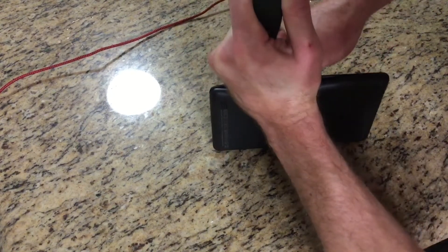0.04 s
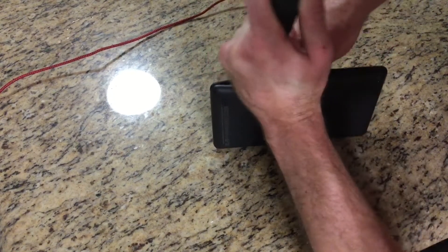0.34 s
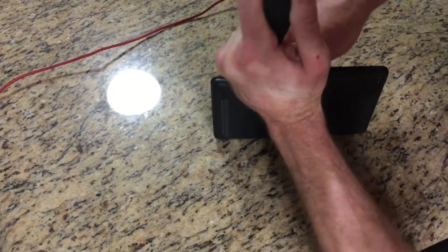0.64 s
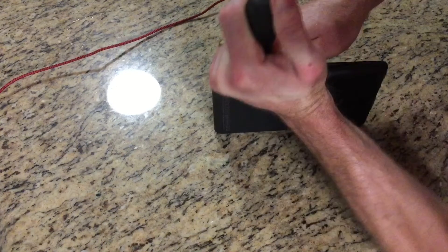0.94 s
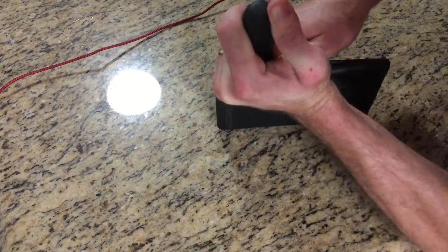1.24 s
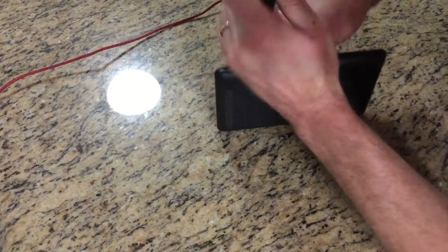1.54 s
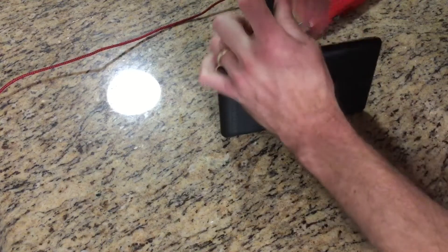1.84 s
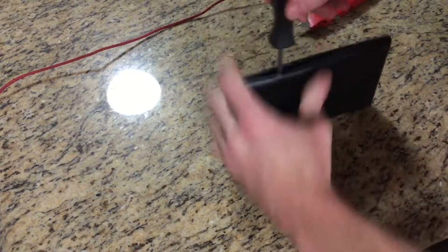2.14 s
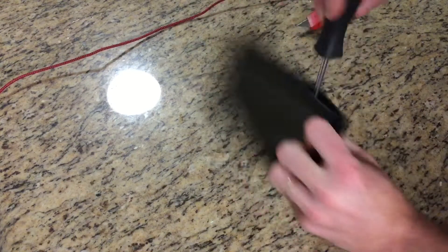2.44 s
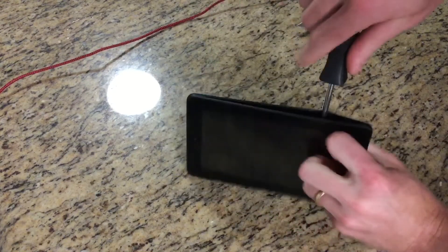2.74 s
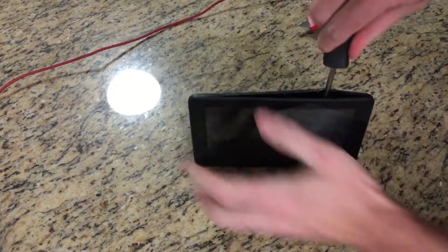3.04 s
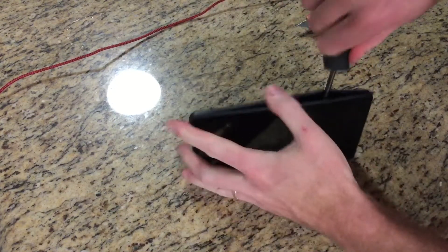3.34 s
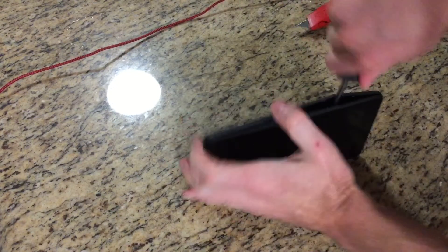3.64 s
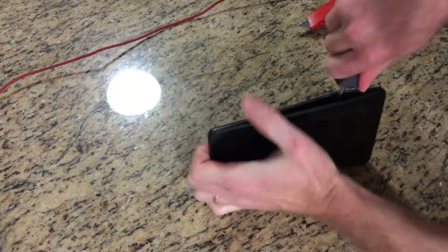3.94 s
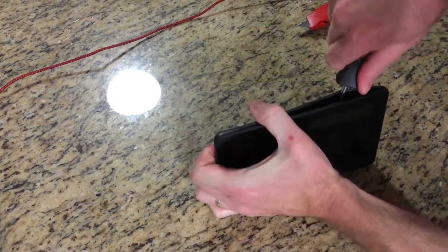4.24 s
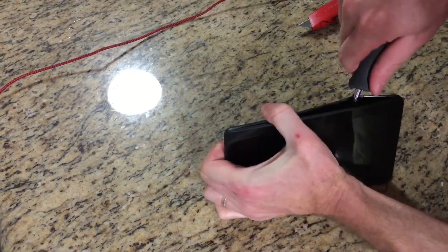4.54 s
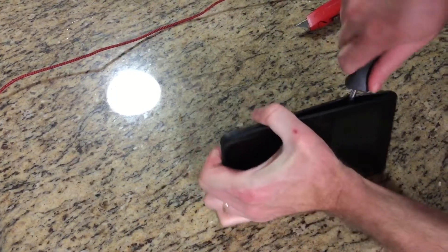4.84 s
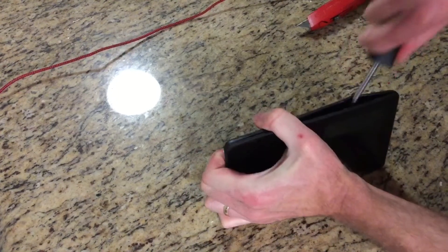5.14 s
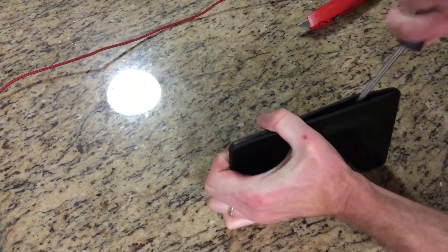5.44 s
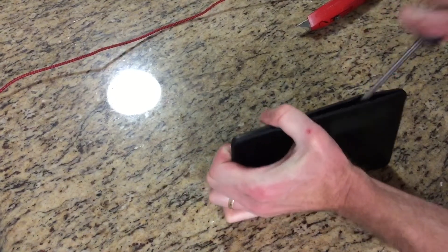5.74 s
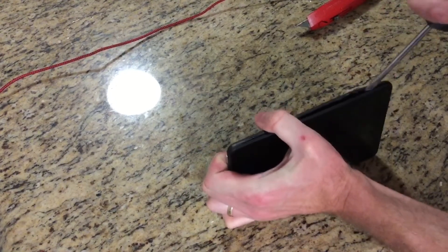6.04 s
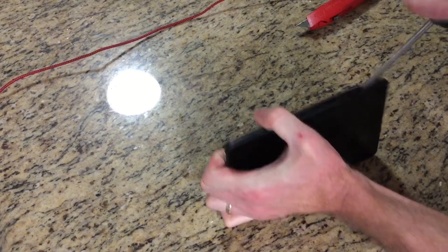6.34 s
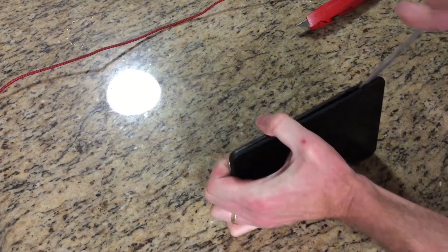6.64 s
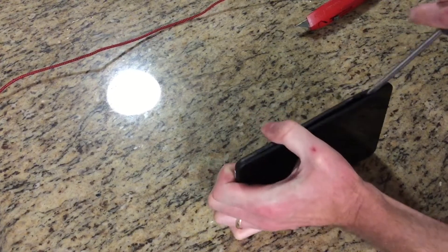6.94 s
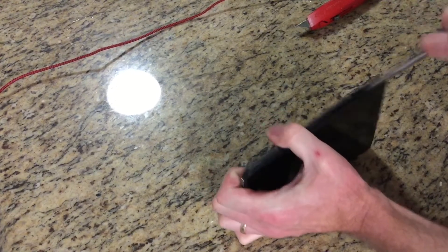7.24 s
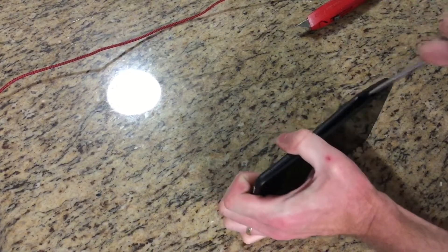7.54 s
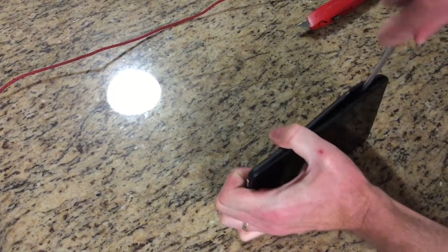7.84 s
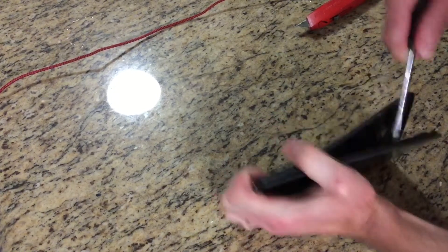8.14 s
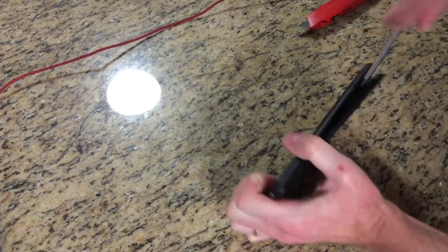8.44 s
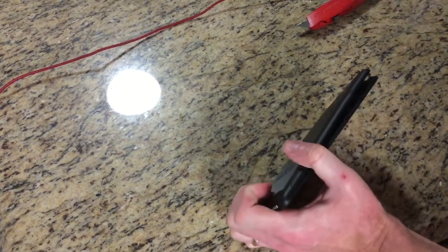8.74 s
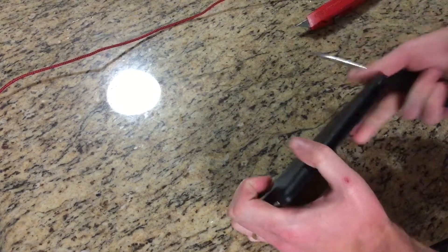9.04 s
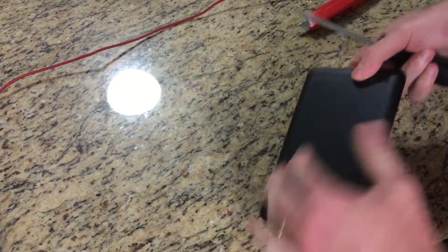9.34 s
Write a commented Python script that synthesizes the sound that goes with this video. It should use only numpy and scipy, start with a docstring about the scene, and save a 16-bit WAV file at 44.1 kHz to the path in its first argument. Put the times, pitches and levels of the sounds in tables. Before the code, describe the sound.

Plastic ticks and snaps irregularly as a tablet case is pried open indoors, with a short metal skid and a loud crack late on.

```python
"""On a stone counter in a hard-walled room, a screwdriver pries open a tablet's plastic case, close-miked.
The strained seam ticks, and catches let go in short snaps that ring the shell. Hands and case rub,
the case judders and bumps on the stone, and the steel blade squeaks and skids. One big crack
overloads the microphone. The walls answer the handling, over a bed of low noise and appliance hum."""
import sys
import numpy as np
from scipy import signal
from scipy.fft import rfft, irfft, next_fast_len
from scipy.io import wavfile

SR = 44100
rng = np.random.default_rng(int(sys.argv[2]) if len(sys.argv) > 2 else 0)


def master(y):
    """Save y as 16-bit WAV."""
    cut = np.clip(np.atleast_2d(y).T, -1, 1)
    pcm = np.round(cut * 32767)  # scale
    wavfile.write(sys.argv[1], SR, pcm.astype(np.int16))


N = 414533
BINS_HZ = np.arange(2049) * SR / 4096
# spectrum of a fresh fracture: f/Hz, level/dB
FRACTURE = [(500, -39.5), (2000, -6), (4000, 0.5), (6000, -1.5), (8500, -1.5), (11000, 0.5), (16000, -3.5)]


def undb(db):
    """Decibels to gain."""
    return 10 ** (np.asarray(db) / 20)


def unit(x):
    """Scale to rms 1."""
    return x / np.sqrt(np.mean(x ** 2) + 1e-30)


def clock(length):
    """Sample times for that many seconds."""
    return np.arange(int(length * SR)) / SR


def add(out, s, x):
    """Mix x in at time s."""
    i = max(int(s * SR), 0)
    out[i:i + len(x)] += x[:len(out) - i]


def along(points, hz):
    """Read (f/Hz, value) points on a log-frequency axis."""
    f, v = np.transpose(points)
    return np.interp(np.log(hz + 0.0012), np.log(f), v)


def colour(x, points, tilt_db=0):
    """EQ x with a curve, tilted per octave about the middle treble."""
    size = next_fast_len(len(x) + 512)
    hz = np.arange(size // 2 + 1) * SR / size
    gain = undb(along(points, hz) + tilt_db * np.log2((hz + 100) / 3000))
    return irfft(rfft(x, size) * gain, size)[:len(x)]


def band(x, hz, kind, order=2):
    """Butterworth filter."""
    return signal.sosfilt(signal.butter(order, hz, kind, fs=SR, output="sos"), x)


def wander(rate, size, count=1024):
    """Random drift of spread near 1, with that many turning points a second."""
    return 1.2 * np.interp(np.arange(size) * rate / SR, np.arange(count), rng.standard_normal(count))


def ring(modes, t):
    """Decaying modes in random phase."""
    hz, db, t60 = np.transpose(modes)[:, :, None]
    cycles = hz * t + rng.random((len(modes), 1))
    return np.sum(undb(db) * 0.00066 ** (t / t60) * np.sin(2 * np.pi * cycles), axis=0)


def blow(x, db):
    """Scale a hit so that its energy, packed into 4 ms, has this level."""
    return x * undb(db) * np.sqrt(.004 * SR / (np.sum(x ** 2) + 1e-30))


def resonance(hz, q):
    """Gain of a damped resonance, 1 at its centre."""
    ratio = (BINS_HZ + 1) / hz
    return 1 / (1 + (q * (ratio - 1 / ratio)) ** 2)


def shell_gain(floor_db=-13):
    """The shell's tone: broad, well-damped resonances over a bed of weaker ones."""
    # resonances of the plastic: f/Hz, width/Hz, level/dB
    resonances = [(364, 20, -2.5), (568, 60, 3.5), (780, 200, 2), (1000, 60, 1), (1156, 83, 4),
                  (1320, 180, 3), (1647, 460, 6), (2280, 600, 3), (2762, 240, -1), (3330, 520, 0),
                  (4200, 400, -7.5), (4850, 380, -4), (5550, 450, -8.5), (6300, 482, -3), (7100, 730, -6.5),
                  (8680, 2000, -2.5), (11100, 5100, -8), (13400, 3300, -4.5)]
    hz, width, db = np.transpose(resonances)[:, :, None]
    peaks = undb(db) ** 2 / (1 + (2 * (BINS_HZ - hz) / width) ** 2)
    return np.sqrt(peaks.sum(axis=0) + undb(floor_db) ** 2)


def spot_gain(depth_db, spacing_hz):
    """Each spot on the shell favours some of its many close modes over others."""
    ripple = np.clip(rng.standard_normal(512), -2, 2)
    return undb(depth_db * np.interp(BINS_HZ / spacing_hz, np.arange(512), ripple))


def strike(gain, tear_s=0):
    """Impulse response with this spectrum; its parts arrive scattered over the tearing time."""
    cepstrum = irfft(np.log(gain + 1e-9))
    size = len(cepstrum)
    # minimum phase puts the energy up front
    cepstrum[1:size // 2] *= 2
    cepstrum[size // 2 + 1:] = 0
    delay = tear_s * (.5 + .5 * np.tanh(wander(900, len(gain))))
    return irfft(np.exp(rfft(cepstrum) - 2j * np.pi * np.cumsum(delay) * BINS_HZ[1]))[:size // 2]


def room_tone(air_db=-51.5, sway_db=2.0, drift_hz=2.577):
    """A bed of low room noise and the wavering hum of an appliance."""
    # spectrum of the room noise: f/Hz, level/dB
    air = [(15, -53.5), (25, -39), (48, -16), (86, -12.5), (113, -1), (169, -12.5), (209, -6), (322, -13.5),
           (359, -10.5), (552, -23), (631, -18.5), (804, -25.5), (1270, -28.5), (1750, -36), (4500, -48),
           (15500, -58)]
    # tones of the hum: f/Hz, level/dB
    hum = [(119.5, -53), (210, -55), (637, -68.5)]
    out = undb(air_db) * unit(colour(rng.standard_normal(N), air))
    for hz, db in hum:
        cycles = np.cumsum(hz + drift_hz * wander(23, N)) / SR
        out += undb(db + sway_db * wander(26, N)) * np.sin(2 * np.pi * cycles)
    return out


def ticks(per_s=2.3, count=8, db=-77, panel_hz=2520, crack_db=-14, knock_hz=1000, knock_db=-24):
    """Strained plastic ticks faintly at random moments; returns rows for snaps()."""
    # the blade works into the seam: start/s, end/s
    prying = [(0.098, 1.4), (3.3, 4.6), (6.0, 7.0)]
    rows = []
    for start, end in prying:
        times = start + (np.arange(count) + rng.random(count)) / per_s
        for s, (level, pitch, crack) in zip(times, rng.standard_normal((count, 3))):
            if s < end:
                hz = panel_hz * 2 ** (0.35 * pitch)
                rows.append((s, db + 4 * level, hz, crack_db + 5 * crack, knock_hz, knock_db))
    return rows


def snaps(tick_rows, panel_db=-9.5, tear_s=.002, flex_s=.0006, splinter_db=-10, splinter_s=0.012):
    """A catch tears free, or the case takes a dull tap: crack, panel ring, hollow knock. Returns direct sound
    and room send."""
    # catches letting go, and dull taps with hardly any crack: t/s, level/dB, panel f/Hz, relative crack/dB,
    # knock f/Hz, relative knock/dB
    events = [(0.194, -46.5, 1075, -41.5, 890, -11), (0.53, -36.5, 970, -50, 870, -5),
              (0.778, -51.5, 2500, -21, 1000, -14), (0.865, -29.5, 2560, -1.5, 870, -8),
              (0.989, -59, 3000, 2, 900, -25), (1.08, -47.5, 2540, -20, 1000, -10),
              (1.19, -49, 2520, -20, 990, -10), (1.375, -46.5, 2600, -16, 1050, -8.5),
              (1.42, -44.5, 2880, -7.5, 1000, -6), (1.578, -19.5, 2020, -19.5, 540, -11),
              (1.619, -32, 1220, -11, 550, -24), (2.261, -53.5, 2200, 1.5, 910, -5),
              (2.352, -51, 3300, -3, 926, -12), (2.508, -39.5, 880, -46, 700, -9),
              (2.622, -16.5, 1694, -10, 830, -9.5), (2.915, -35.5, 2900, -4.5, 1500, -29),
              (3.421, -54.5, 3000, -8.5, 1250, -7), (3.806, -46.5, 3450, -24, 1300, -14),
              (4.451, -42.5, 2100, -11.5, 895, -22), (4.783, -39.5, 1890, -34, 920, -17),
              (4.807, -17, 1780, -46, 450, -14), (4.878, -20.5, 2070, -19.5, 445, -15),
              (5.405, -41.5, 2100, -12, 900, -34), (5.754, -25.5, 2300, -9.5, 1500, -21),
              (5.778, -19.5, 1750, -12.5, 520, -8), (5.781, -10.5, 2830, -10.5, 1137, -13),
              (5.806, -15.5, 2000, -8.5, 1081, -10.5), (6.222, -69.5, 3500, 8.5, 1010, -22),
              (6.3, -43, 1810, -26, 894, -4.5), (7.139, -25.5, 2280, -13, 890, -12.5),
              (7.78, -56.5, 3470, -4, 1418, -16.5), (7.891, -40.5, 1580, -31.5, 800, -8.5),
              (8.029, -1.5, 1960, -4, 737, -10), (8.288, -16.5, 3220, -6, 1830, -13.5),
              (8.464, -39.5, 1187, -33, 800, -6), (8.59, -39.5, 2056, -18, 825, -2.5),
              (8.931, -51.5, 1474, 5, 865, 1)]
    out, shell, hz, t = np.zeros((2, N)), shell_gain(), BINS_HZ + 1, clock(.02)
    top_octaves = np.log2(np.maximum(hz / 5000, 1))
    for s, db, panel_hz, crack_db, knock_hz, knock_db in events + tick_rows:
        # a weak crack is also a blunt one: it loses its top first
        crack = undb(along(FRACTURE, hz) + 0.8 * min(crack_db, 0) * top_octaves)
        panel, knock = resonance(panel_hz, q=1.2), resonance(knock_hz, q=1.0)
        layers = (panel, panel_db), (knock, knock_db), (crack, crack_db - 1)
        power = sum((unit(shape * shell) * undb(layer_db)) ** 2 for shape, layer_db in layers)
        # tiny splinters give way just after the main break
        force = rng.standard_normal(len(t)) ** 3 * np.exp(-t / splinter_s)
        force *= undb(splinter_db) / np.sqrt(np.sum(force ** 2))
        force[0] += 1
        # the microphone hears some modes more than others; the walls get them more evenly
        spot = spot_gain(depth_db=4.5, spacing_hz=240)
        for path, reach in zip(out, (spot, np.sqrt(spot))):
            snap = signal.fftconvolve(force, strike(np.sqrt(power) * reach, tear_s))
            add(path, s + flex_s, blow(snap, db + 10 * np.log10(power.mean())))
    return out


def rubs(grain_db=2.5, snags_per_s=90, snag_db=-6, attack_s=0.05, release_s=0.065):
    """Hands, case and blade slide: fine grain and harder snags, heard through seam and shell."""
    # strokes: t/s, length/s, level/dB, tilt/(dB per octave), rubbed part's f/Hz, its ring/dB
    strokes = [(0.223, 0.24, -73.5, 0, 1090, 1), (0.408, 0.29, -70, -1, 1090, 15),
               (1.66, 0.69, -77, 6.5, 10300, 4), (2.216, 0.16, -59, -2.5, 6450, 7.5),
               (2.321, 0.075, -54.5, 9.5, 7000, -1), (2.75, 0.11, -61, 3.5, 5070, -8),
               (3.548, 0.14, -54.5, -2, 600, -3), (3.77, 0.2, -72.5, -0.5, 1500, -8),
               (4.332, 0.2, -59.5, -3, 4200, -8), (4.982, 0.29, -58.5, 1.5, 3400, -2),
               (5.041, 0.27, -66, -13.5, 219, 2), (5.377, 0.12, -59, 0, 2020, -0.5),
               (5.462, 0.13, -66, .5, 2094, -9.5), (5.661, 0.11, -53, 1, 2000, 3.5),
               (5.69, 0.2, -48.5, -0.5, 3536, -3.5), (6.507, 0.33, -61.5, -1.5, 1270, 14),
               (7.53, 0.11, -53.5, 1, 5300, -4), (8.404, 0.33, -57, -1, 900, 10.5),
               (8.867, 0.12, -64, -2.5, 2940, -2), (9.157, 0.28, -63.5, -2, 1400, -10)]
    # spectrum of sliding friction: f/Hz, level/dB
    friction = [(200, 1), (700, 1), (1300, -4), (2000, -2), (3400, -5), (4500, -1.5), (8000, -10),
                (16000, -12.5)]
    # resonances of the scraped seam: f/Hz, Q, level/dB
    seam_modes = [(2000, 9.8, -7), (3450, 10, -7)]
    out = np.zeros(N)
    grain = unit(rng.choice([-1, 1], N) * undb(grain_db * np.minimum(rng.exponential(size=N), 5)))
    snags = unit((rng.random(N) < snags_per_s / SR) * rng.uniform(-1, 1, N))
    pressure = undb(1.5 * (wander(70, N) - wander(12, N)))
    texture = (grain + undb(snag_db) * snags) * pressure
    seam = 1 + sum(undb(db) * resonance(hz, q) for hz, q, db in seam_modes)
    for s, length, db, tilt_db, part_hz, ring_db in strokes:
        stroke = texture[int(s * SR):][:int(length * SR)]
        t = np.arange(len(stroke)) / SR
        swell = np.clip(t / attack_s, 0, 1) * np.clip((length - t) / release_s, 0, 1)
        part = 1 + undb(ring_db) * resonance(part_hz, q=6.5)
        shell = strike(shell_gain() * seam * part * spot_gain(depth_db=3, spacing_hz=350))
        grit = signal.fftconvolve(colour(stroke, friction, tilt_db), shell)[:len(stroke)]
        add(out, s, undb(db) * unit(grit * swell))
    return out


def judder(start_hz=100, sag_hz_per_s=190, groan_db=-42, creak_db=-63, uneven=0.083, slip_s=0.011):
    """The case's edge stutters over the stone in slowing, unequal slips: a falling groan, a faint creak."""
    # the drag: t/s, length/s
    drag = (1.38, .16)
    # resonances of the dragging edge: f/Hz, Q, level/dB
    edge_modes = [(3100, 14, 11), (3530, 21, -5), (4620, 25, -2), (6260, 37, 4.5)]
    start, length = drag
    out, t = np.zeros(N), clock(length)
    slip_hz = (start_hz - sag_hz_per_s * t) * (1 + uneven * wander(60, len(t)))
    pulses = np.diff(np.floor(np.cumsum(slip_hz) / SR), prepend=0)
    slips = pulses * np.sin(np.pi * t / length) * undb(3 * wander(91, len(t)))
    # each slip grinds briefly and rings the edge
    grit = signal.fftconvolve(slips, np.exp(-t / slip_s))[:len(t)] * rng.standard_normal(len(t))
    edge = 1 + sum(undb(db) * resonance(hz, q) for hz, q, db in edge_modes)
    shell = strike(shell_gain() * spot_gain(depth_db=6, spacing_hz=260) * edge)
    creak = unit(band(signal.fftconvolve(grit, shell)[:len(t)], 8700, "lowpass"))
    groan = unit(band(slips, [60, 180], "bandpass"))
    add(out, start, undb(groan_db) * groan + undb(creak_db) * creak)
    return out


def bumps(rise_s=.0008):
    """The hollow case thumps on the stone: higher in a stiffer grip, longer in a looser one."""
    # dull hits: t/s, level/dB, pitch factor, ring-time factor
    hits = [(1.419, -25, 1.07, 1.2), (2.624, -24.5, 1.05, 7.5), (5.783, -24.5, 1.57, 4.5),
            (5.806, -28, 1.3, 5.5), (7.327, -22.5, 1.2, 1.2), (8.0314, 5, 1, .9)]
    # low modes of the hand-held case: f/Hz, level/dB, t60/s
    modes = [(302, -16.5, 0.044), (186, 0, 0.021), (116, -18, .065), (75, -25.5, .16)]
    out, t = np.zeros(N), clock(0.44)
    for s, level_db, pitch, sustain in hits:
        thump = sum(undb(db - 60 * t / (t60 * sustain)) * np.sin(2 * np.pi * pitch * hz * t)
                    for hz, db, t60 in modes)
        add(out, s, -undb(level_db) * (1 - np.exp(-t / rise_s)) * thump)
    return out


def clack():
    """The stiff edge of the case lands on the stone and rings briefly."""
    # the landing: t/s, level/dB
    landing = (2.6225, -16.5)
    # modes of the struck edge: f/Hz, level/dB, t60/s
    modes = [(327, -15, .09), (583, -10, 0.041), (940, -13, 0.028), (1570, 0, 0.019), (1734, -1, .018),
             (2950, -5.5, 0.014)]
    s, level_db = landing
    out, t = np.zeros(N), clock(.2)
    edge = sum(undb(db - 60 * t / t60) * np.sin(2 * np.pi * hz * t) for hz, db, t60 in modes)
    add(out, s, undb(level_db) * edge)
    return out


def squeaks(waver=0.008, attack_s=0.0022):
    """Fast stick-slip at the tip: a thin, wavering whistle that rises when the blade speeds up."""
    # steel on plastic: t/s, level/dB, start f/Hz, end f/Hz, length/s
    glides = [(5.416, -49, 11200, 11160, 0.04), (5.446, -59, 11200, 11360, 0.087),
              (7.3202, -15.5, 2935, 4600, 0.0064), (7.3257, -16.5, 4860, 6190, 0.023),
              (7.329, -16, 7930, 9120, 0.015)]
    out = np.zeros(N)
    for s, db, start_hz, end_hz, length in glides:
        t = clock(length)
        hz = np.linspace(start_hz, end_hz, len(t)) * (1 + waver * wander(600, len(t)))
        envelope = (1 - np.exp(-t / attack_s)) * np.sqrt(1 - t / length)
        add(out, s, undb(db) * envelope * np.sin(2 * np.pi * np.cumsum(hz) / SR))
    return out


def skid(steel_db=-2, shell_db=-21, attack_s=0.003):
    """The tip slips: a rush of tiny impacts hisses and sets the blade ringing."""
    # slip along the seam: t/s, level/dB, length/s
    slips = [(7.3188, -11, 0.018)]
    # modes of the steel blade: f/Hz, level/dB, ring time/s
    blade = [(3730, -16, .03), (4620, -13, .03), (5150, -7, 0.027), (5590, -7.5, .035), (6070, -7, .007),
             (8430, -11, .028), (8580, -24, .26), (8740, -11.5, 0.045), (8900, -8.5, .03),
             (10900, -11, 0.028), (12900, -14, 0.019), (14900, -4, .02)]
    out, t = np.zeros(N), clock(.35)
    for s, db, length in slips:
        force = rng.standard_normal(len(t)) * (1 - np.exp(-t / attack_s)) * np.exp(-(t / length) ** 4)
        scrape = band(colour(force, FRACTURE, tilt_db=1.0), 3200, "highpass")
        # the ring builds while the tip is moving
        steel = np.cumsum(force ** 2) / np.sum(force ** 2) * ring(blade, t)
        shell = band(signal.fftconvolve(force, strike(shell_gain()))[:len(t)], 1800, "lowpass")
        add(out, s, undb(db) * (blow(scrape, 0) + blow(steel, steel_db) + blow(shell, shell_db)))
    return out


def reverb(send, wet_db=-4.0, early_db=3, early_s=0.059):
    """Dense reflections off counter and walls, strongest at first; the very top dies soonest."""
    # tone of the reflections: f/Hz, level/dB
    tone = [(60, -20.5), (200, -4), (500, -1.5), (1000, -1), (2500, -5), (5000, -6), (9000, -5), (16000, 4)]
    # decay of the room: f/Hz, t60/s
    decay = [(100, 0.13), (500, 0.38), (1200, 0.56), (2800, 0.44), (5500, 0.56), (9000, 0.36),
             (15000, 0.036)]
    t = clock(.8)
    noise = rfft(rng.standard_normal(len(t)))
    octave = np.log2(np.arange(len(noise)) * SR / len(t) + 1)
    centres = np.arange(6, 15)  # octave bands from 64 Hz up
    tail = 0
    for centre, weights in zip(centres, np.eye(len(centres))):
        noise_band = irfft(noise * np.interp(octave, centres, weights), len(t))
        tail += noise_band * undb(-60 * t / along(decay, 2. ** centre))
    onset = np.clip(t / 0.0019 - .5, 0, 1)
    tail *= onset * undb(early_db * np.exp(-t / early_s))
    tail = colour(tail / np.sqrt(np.sum(tail ** 2)), tone)
    return undb(wet_db) * signal.fftconvolve(send, tail)[:N]


def scene(bump_send_db=-11):
    """Handling, reverb and room tone in mono; the close bumps hardly reach the walls."""
    sliding = skid() + squeaks() + rubs() + judder()
    knocks = bumps() + clack()
    snap_direct, snap_send = snaps(ticks())
    echo = reverb(snap_send + sliding + undb(bump_send_db) * knocks)
    return (snap_direct + sliding + knocks + echo + room_tone())[None]


def record(dry, low_cut_hz=42, top_hz=15900):
    """The microphone drops the deepest bass, the input clips at full scale and the top is cut."""
    clipped = np.clip(band(dry, low_cut_hz, "highpass", order=5), -1, 1)
    return signal.sosfilt(signal.ellip(8, .2, 85, top_hz, fs=SR, output="sos"), clipped)


dry = scene()
out = record(dry)
master(out)
```